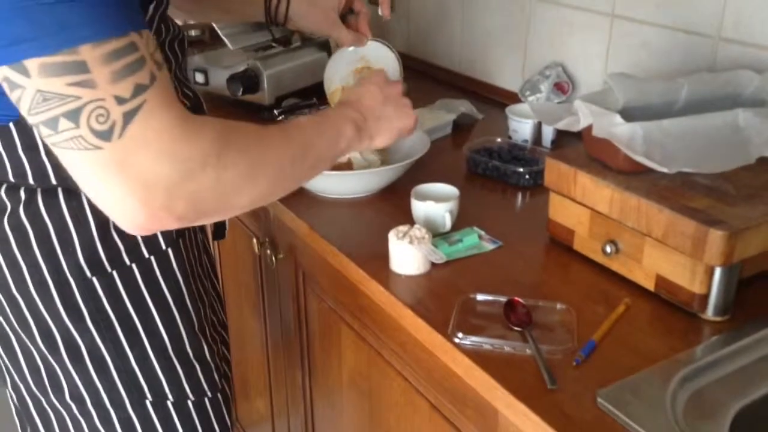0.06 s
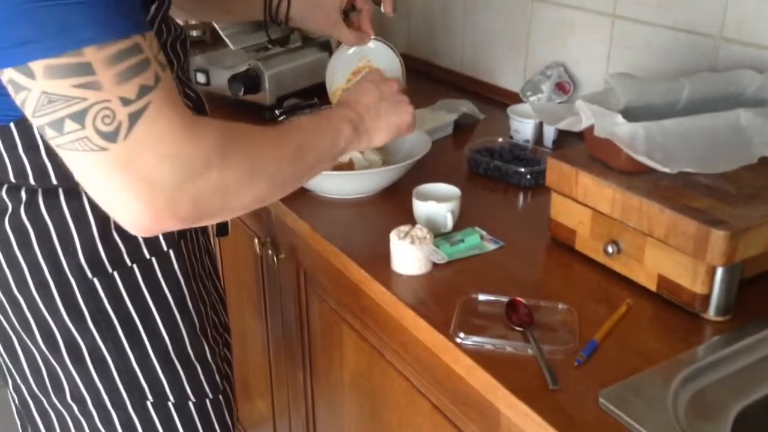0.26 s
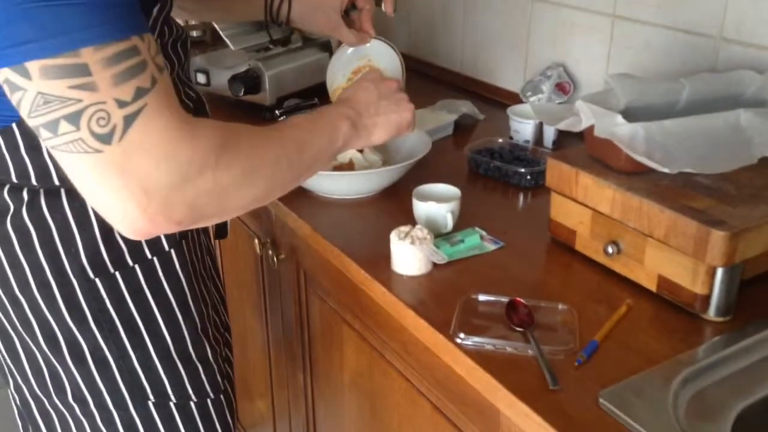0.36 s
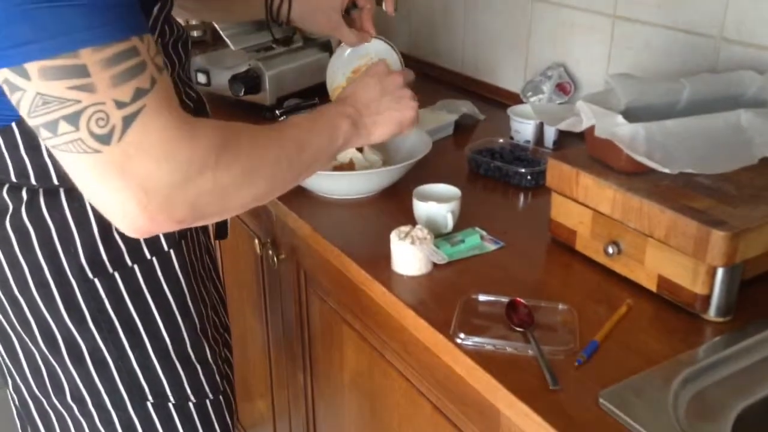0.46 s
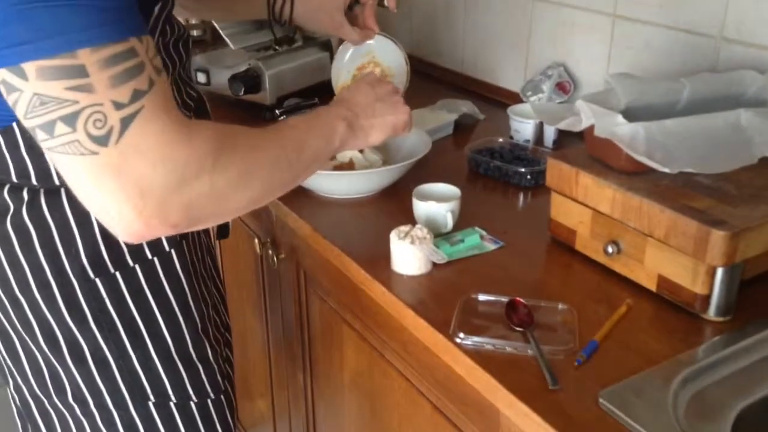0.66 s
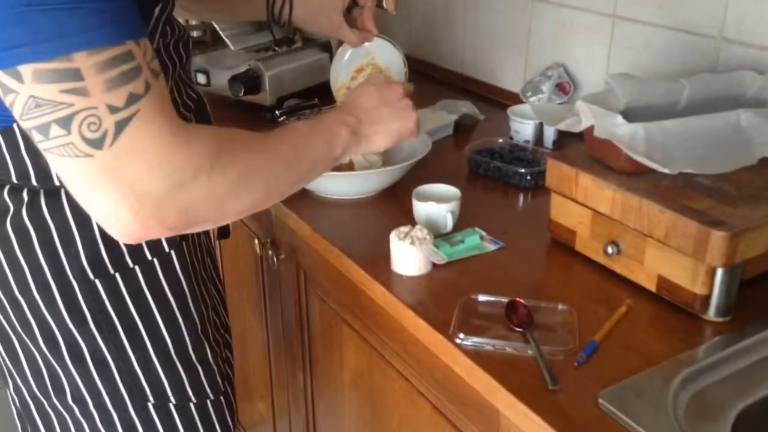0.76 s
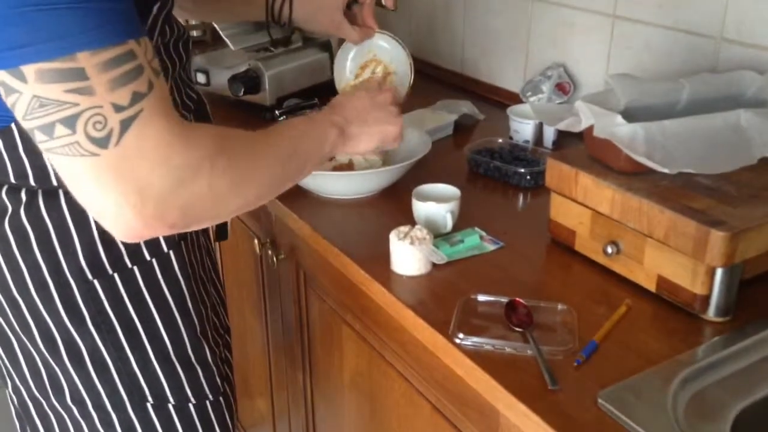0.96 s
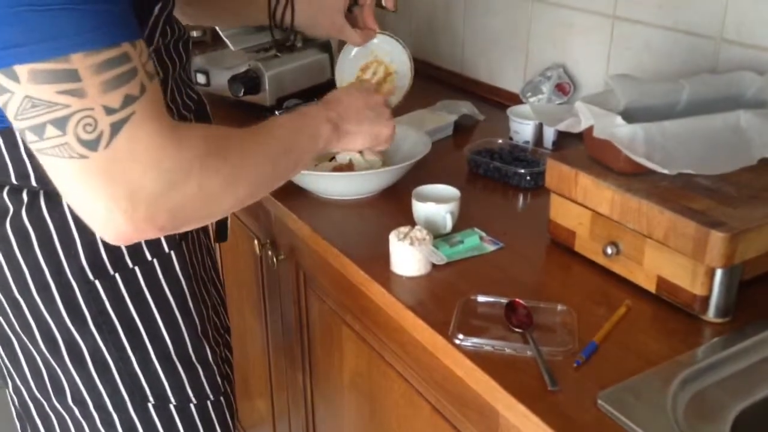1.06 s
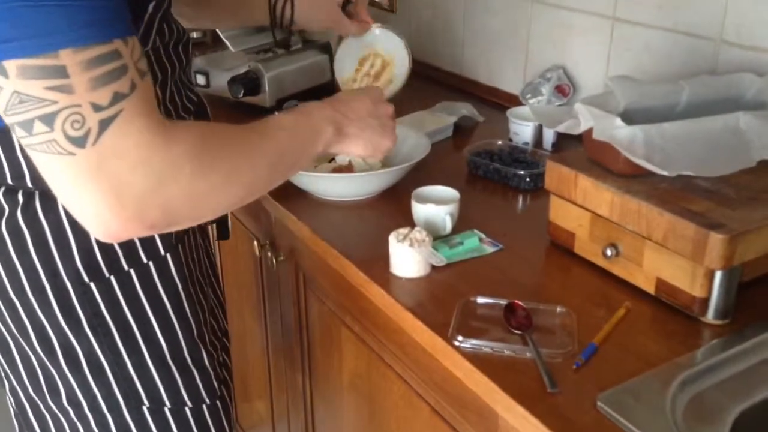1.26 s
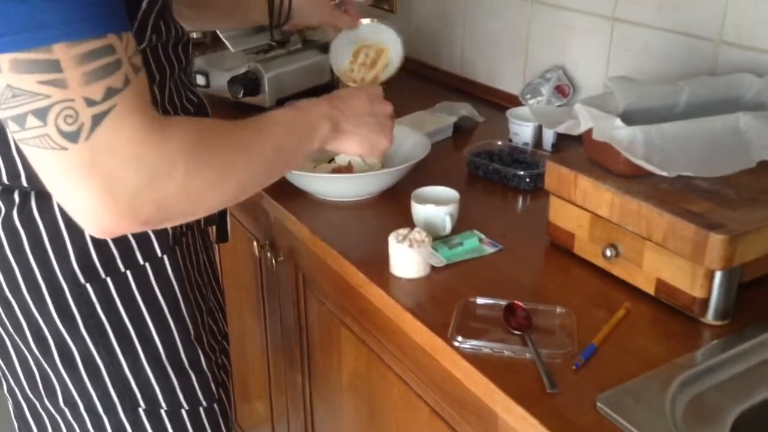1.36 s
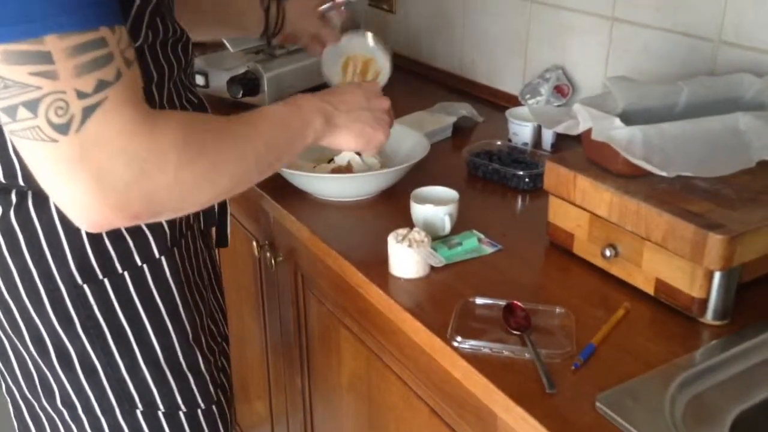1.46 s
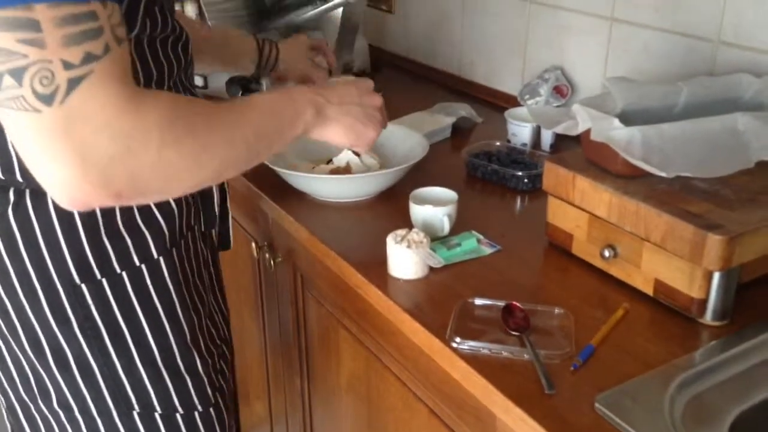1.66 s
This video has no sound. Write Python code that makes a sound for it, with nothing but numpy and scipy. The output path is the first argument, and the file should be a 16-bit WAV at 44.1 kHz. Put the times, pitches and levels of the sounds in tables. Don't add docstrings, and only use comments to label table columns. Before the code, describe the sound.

Bright, short clinks of spoon on china over a fading earlier ring, two double taps and a single one, then a tiny scrape, dull faint rustling and quiet room hiss in a lively home kitchen.

```python
import sys
import numpy as np
from scipy import signal
from scipy.fft import rfft, irfft
from scipy.io import wavfile

SR = 44100
rng = np.random.default_rng(int(sys.argv[2]) if len(sys.argv) > 2 else 0)


def to_wav(s):
    ch = np.atleast_2d(s).T
    pcm = np.round(np.clip(ch, -1, 1) * 32767)
    wavfile.write(sys.argv[1], SR, pcm.astype(np.int16))


def voltage_ratio(decibels):
    exponent = np.asarray(decibels, float) / 20
    return 10 ** exponent


N = 74970
LEAD = 8820

# (frequency [Hz], level [dB])
HISS_COLOUR = [(30, -50.5), (100, -29.5), (200, -9), (400, -11.5), (800, -16), (2000, -18), (12300, -22.5),
               (16000, -23.5)]
# (delay [s], level [dB])
REFLECTIONS = [(.0025, -12), (.0072, -12.5), (.0095, -19), (.019, -18.5)]
# (frequency [Hz], t60 [s])
KITCHEN_T60 = [(200, .5), (600, 0.3637), (1500, 0.5931), (4000, 0.4316), (8000, 0.3632), (15000, 0.274)]
# (frequency [Hz], width [Hz], depth [0-1])
TAP_DIPS = [(485, 50, 0.8), (4492, 710, .95), (8900, 390, 0.5), (11430, 540, 0.8)]
# (frequency [Hz], level [dB])
RECORDER_TOP = [(15100, 1.5), (15500, -30.5), (16000, -26.5), (16500, -30.5), (17000, -77.5)]
# (time [s], frequency [Hz], level [dB])
SQUEAK_GLIDE = [
    (1.436, 3900, -88.5),
    (1.444, 4110, -68.5),
    (1.452, 5150, -72),
    (1.458, 5350, -69),
    (1.467, 5350, -69),
    (1.478, 5390, -92),
]
# (time [s], level [dB])
SHUFFLE_EFFORT = [
    (1.215, -79.5),
    (1.228, -61.5),
    (1.28, -64.5),
    (1.33, -64.5),
    (1.4, -73),
    (1.5, -76.5),
    (1.7, -78.5),
]
# (frequency [Hz], level [dB], t60 [s])
WORKTOP_MODES = [(210, 0, 0.027), (532, -10, 0.09), (726, -5.5, 0.016), (1025, -3, 0.04),
                 (1092, -5.5, 0.018), (1280, -2, .025), (1895, -5.5, 0.024), (2440, -7, .01),
                 (2900, -13, 0.021), (3900, -16, 0.0092)]
# (frequency [Hz], level [dB], t60 [s])
SCRAPE_MODES = [(1130, -10, 0.011), (2200, -44, 0.0045), (4200, -2.5, 0.012), (5500, 2.5, 0.013),
                (6140, 0.5, 0.0039), (7900, 3, 0.0043), (10120, 1, 0.0051), (13200, -4, .0012)]
# (frequency [Hz], level [dB])
CRACK_COLOUR = [(150, -25), (400, -6.5), (750, 5.5), (1100, 3), (3700, 2), (6300, 4), (8500, -2),
                (14500, -3.5)]
# (time [s], contact [dB], saucer ring [dB], spoon middle ring [dB], spoon top ring [dB])
TAP_EVENTS = [
    (-0.075, -11, -12, -16, -18.5),
    (0.211, -10.5, -16.5, -15, -14.5),
    (0.2959, -14.5, -21, -26.5, -30.5),
    (0.5368, -13, -24.5, -18.5, -15),
    (0.5985, -15.5, -18.5, -29.5, -30),
    (0.8837, -14, -19.5, -21.5, -16),
]
# (frequency [Hz], level [dB], t60 [s])
SAUCER_MODES = [(790, -13, 0.0067), (1065, -8.5, 0.016), (347, -20.5, 0.043), (1633.7, -20, .08),
                (2476.6, -13.5, 0.041), (3180, -7.5, 0.005), (3900, -7.5, 0.0098), (5100, -19.5, 0.045),
                (5167, -0.5, 0.022), (5219, -16, 0.15), (5260, -7, 0.029)]
# (frequency [Hz], level [dB], t60 [s])
SPOON_MID_MODES = [(5586, -5.5, 0.028), (5866, -5.5, 0.015), (6304, -6.5, 0.013), (7037, -5, 0.04),
                   (7256, -2, 0.018), (7275, -21, 0.25)]
# (frequency [Hz], level [dB], t60 [s])
SPOON_TOP_MODES = [(9924, -21.5, 0.029), (10170, 0, 0.042), (10165, -5, 0.033), (10300, -0.5, 0.016),
                   (10750, -18.5, 0.021), (12800, -10, 0.0033), (13500, -11, 0.0084), (13900, -12, 0.017)]
# (frequency [Hz], level [dB], t60 [s])
FAR_RIM_MODES = [(632, -33, 0.022), (2880, -30.5, 0.011), (3296, -24.5, 0.0084), (3780, -26.5, 0.0096),
                 (8100, -30, 0.01), (8700, -43.5, 0.0072), (12400, -30, 0.0075)]


def at_hz(points, hz):
    table = np.array(points)
    return np.interp(np.log(hz), np.log(table[:, 0]), table[:, 1])


def bins_hz(size):
    return np.maximum(np.fft.rfftfreq(size, 1 / SR), 10)


def rms_one(x):
    return x / np.sqrt(np.mean(x ** 2) + 1e-20)


def ring(clicks, hz, t60):
    radius = voltage_ratio(-60 / (t60 * SR))
    turn = 2 * np.pi * hz / SR
    return signal.lfilter([0, np.sin(turn)], [1, -2 * radius * np.cos(turn), radius ** 2], clicks + 1e-18)


def dying(size, t60):
    return np.exp(-np.log(1000) * np.arange(size) / SR / t60)


def grains(per_s, body, gain):
    clicks = (rng.random(N) < per_s / SR) * rng.standard_normal(N)
    sound = sum(voltage_ratio(db) * rms_one(ring(clicks, hz, t60)) for hz, db, t60 in body)
    return np.pad(gain * rms_one(sound), (LEAD, 0))


def hiss():
    spectrum = rfft(rng.standard_normal(N)) * voltage_ratio(at_hz(HISS_COLOUR, bins_hz(N)))
    return voltage_ratio(-64.5) * rms_one(irfft(spectrum, N))


def kitchen(x):
    tail_db, rise_s = 1.5, 0.00281
    early_db, early_t60_s = 11, 0.091
    size = SR // 2
    edges = 100 * 2 ** np.arange(0, 7.6, .5)
    white = rng.standard_normal((2, size))
    tail = np.zeros(size)
    for k, (lo, hi) in enumerate(zip(edges, edges[1:])):
        band = signal.butter(2, [lo, hi], "band", fs=SR, output="sos")
        t60 = at_hz(KITCHEN_T60, np.sqrt(lo * hi))
        tail += signal.sosfilt(band, white[k % 2]) * dying(size, t60)
    tail *= 1 + voltage_ratio(early_db) * dying(size, early_t60_s)
    tail *= 1 - np.exp(-np.arange(size) / SR / rise_s)
    tail *= voltage_ratio(tail_db) / np.sqrt(np.sum(tail ** 2))
    tail[0] = 1
    for delay, db in REFLECTIONS:
        tail[int(delay * SR)] += voltage_ratio(db)
    return signal.fftconvolve(x, tail)[LEAD:LEAD + N]


def dips(x):
    for hz, width_hz, depth in TAP_DIPS:
        b, a = signal.iirpeak(hz, hz / width_hz, SR)
        x = x - np.clip(depth, 0, 1) * signal.lfilter(b, a, x)
    return x


def squeak():
    s, hz, db = np.transpose(SQUEAK_GLIDE)
    t = np.arange(N) / SR
    level = voltage_ratio(np.interp(t, s, db, left=-200, right=-200))
    phase = 2 * np.pi * np.cumsum(np.interp(t, s, hz)) / SR
    return np.pad(level * np.sin(phase), (LEAD, 0))


def shuffle():
    s, db = np.transpose(SHUFFLE_EFFORT)
    effort = voltage_ratio(np.interp(np.arange(N) / SR, s, db, left=-200))
    return grains(900, WORKTOP_MODES, effort)


def scrape():
    centre_s, rise_s, fall_s, level_db = 1.058, .007, .004, -48
    t = np.arange(N) / SR - centre_s
    swell = np.exp(-.5 * (t / np.where(t < 0, rise_s, fall_s)) ** 2)
    return grains(6000, SCRAPE_MODES, voltage_ratio(level_db) * swell)


def crack():
    cepstrum = irfft(np.log(voltage_ratio(at_hz(CRACK_COLOUR, bins_hz(2048)))))
    cepstrum[1:1024] *= 2
    cepstrum[1025:] = 0
    return irfft(np.exp(rfft(cepstrum)))


def contacts():
    crack_db, chatter_db, chatter_t60_s = 9, -24, .003
    out = np.zeros(N + LEAD)
    for s, db, *_ in TAP_EVENTS:
        chatter = voltage_ratio(chatter_db) * rng.standard_normal(1024) * dying(1024, chatter_t60_s)
        chatter[0] = -1
        i = int(s * SR) + LEAD
        out[i:i + 3071] += voltage_ratio(db + crack_db) * np.convolve(chatter, crack())
    return out


def taps():
    spread_db = 2.5
    rows = np.array(TAP_EVENTS)
    at = (rows[:, 0] * SR).astype(int) + LEAD
    out = np.zeros(N + LEAD)
    for column, modes in enumerate((SAUCER_MODES, SPOON_MID_MODES, SPOON_TOP_MODES)):
        spread = spread_db * rng.standard_normal((len(rows), len(modes)))
        for k, (hz, db, t60) in enumerate(modes):
            tap_db = rows[:, 2 + column] if hz > 4500 else rows[:, 1] - (hz < 4500) * 10
            clicks = np.zeros(N + LEAD)
            clicks[at] = -(-1) ** k * voltage_ratio(tap_db + db + spread[:, k])
            out += ring(clicks, hz, t60)
    last = np.zeros(N + LEAD)
    last[at[-1]] = 1
    for k, (hz, db, t60) in enumerate(FAR_RIM_MODES):
        out += (-1) ** k * voltage_ratio(db) * ring(last, hz, t60)
    return out


def scene():
    handling = dips(taps()) + scrape() + shuffle() + squeak()
    both = kitchen(handling) + kitchen(dips(contacts()))
    low_cut = signal.butter(3, 192, "high", fs=SR, output="sos")
    return (signal.sosfilt(low_cut, both) + hiss())[None]


def top_cut(x):
    return signal.sosfilt(signal.butter(12, 16520, fs=SR, output="sos"), x)


def record(dry):
    limit = 0.71
    limited = limit * np.tanh(dry / limit)
    mix = irfft(rfft(limited) * voltage_ratio(at_hz(RECORDER_TOP, bins_hz(N))), N)
    return top_cut(mix)


dry = scene()
out = record(dry)
to_wav(out)
```